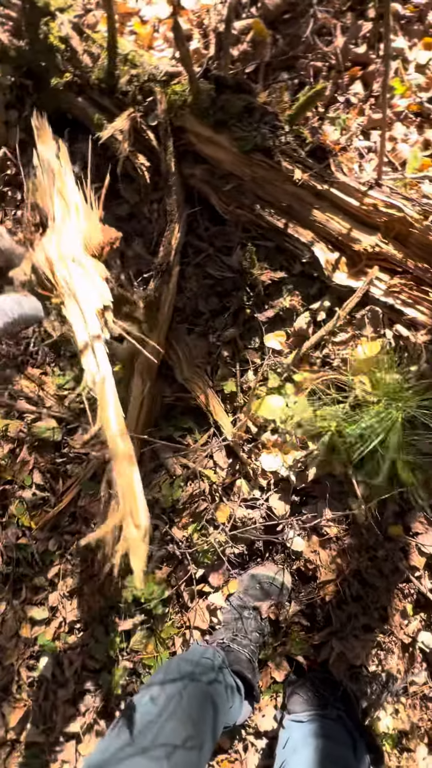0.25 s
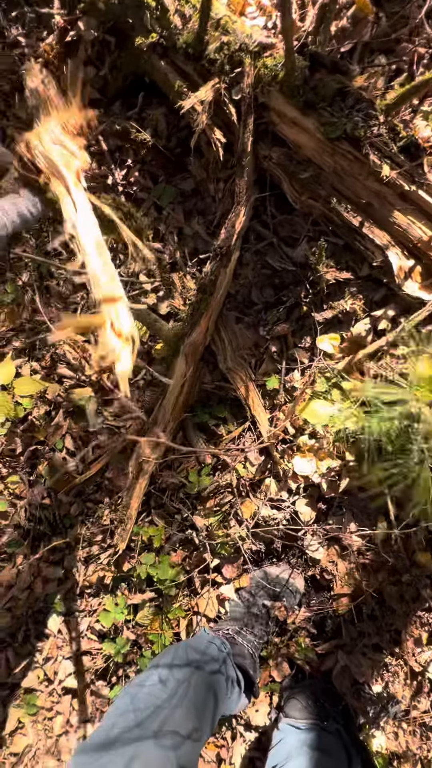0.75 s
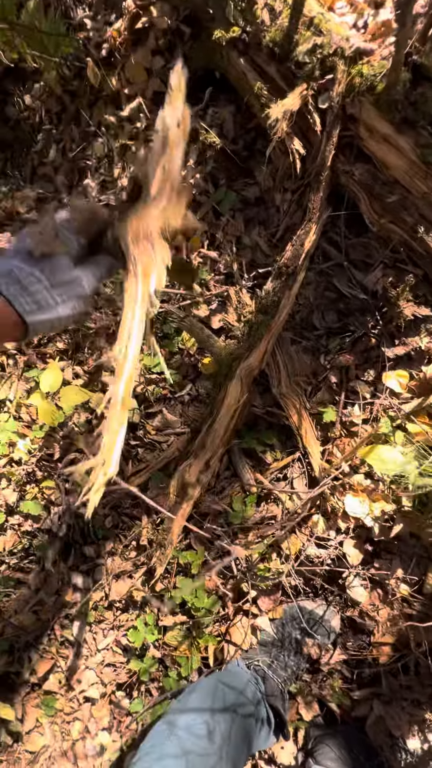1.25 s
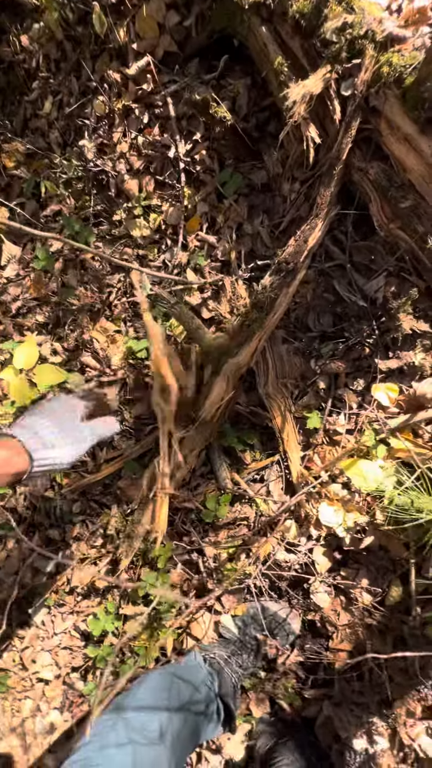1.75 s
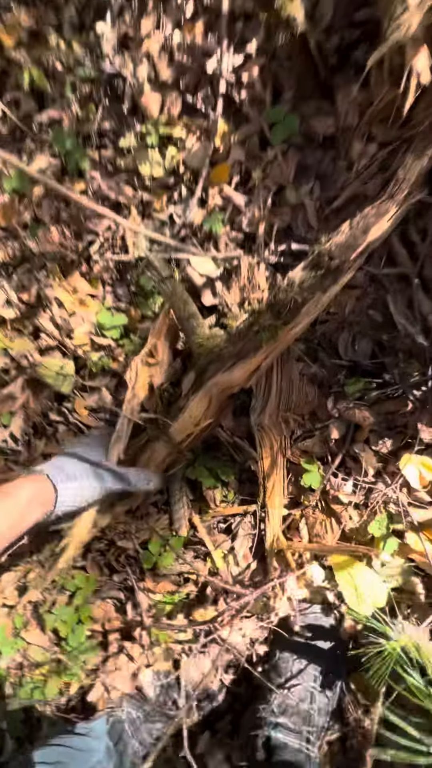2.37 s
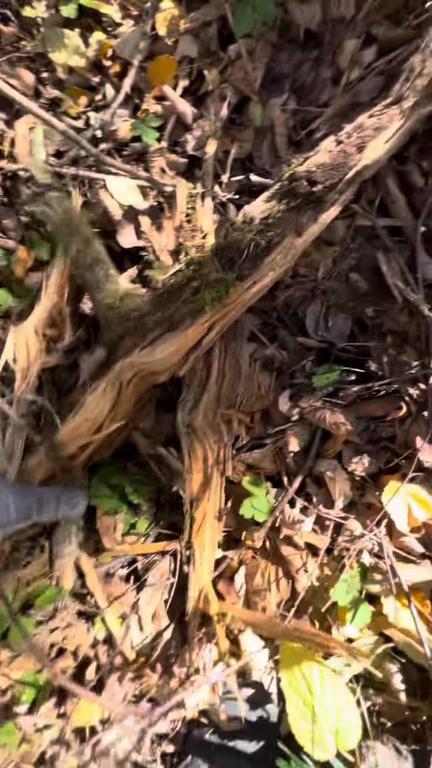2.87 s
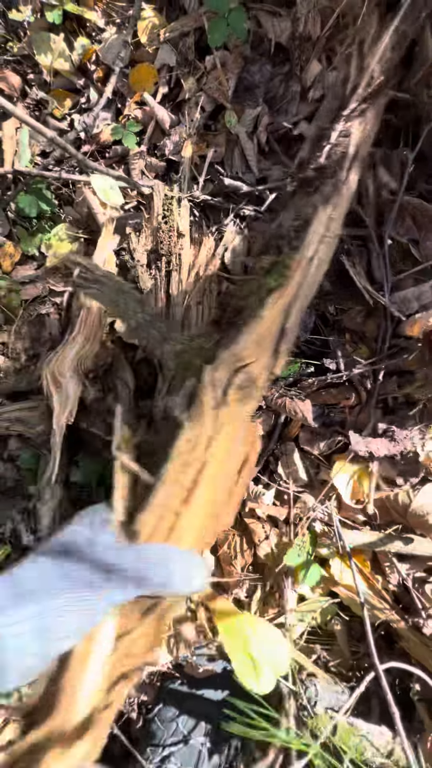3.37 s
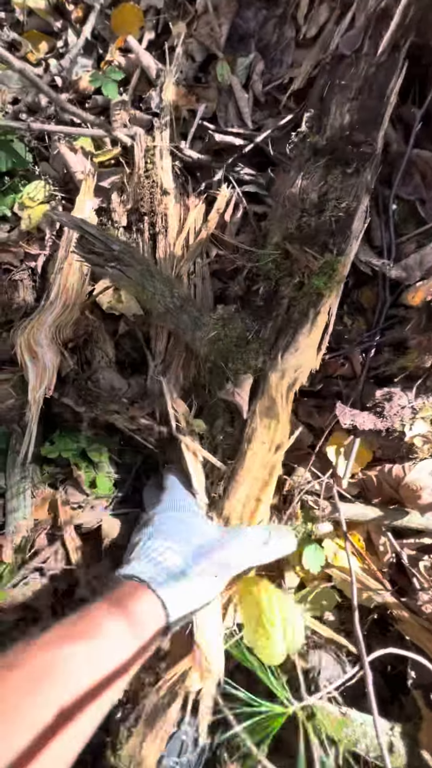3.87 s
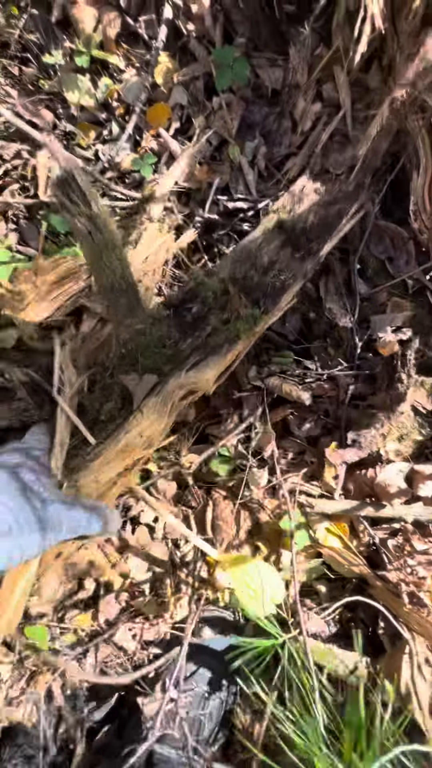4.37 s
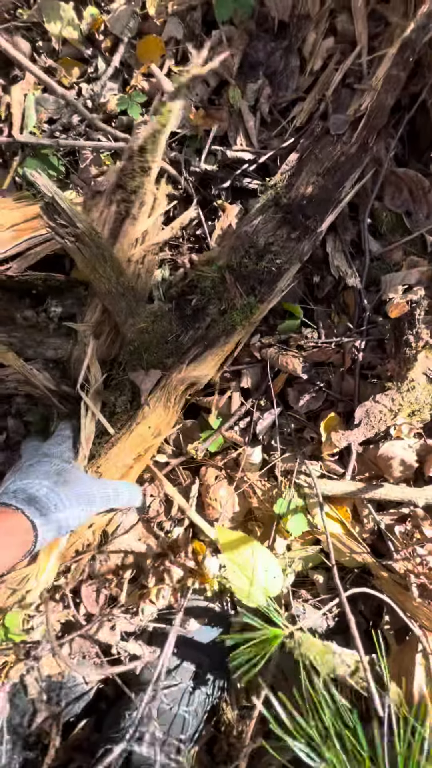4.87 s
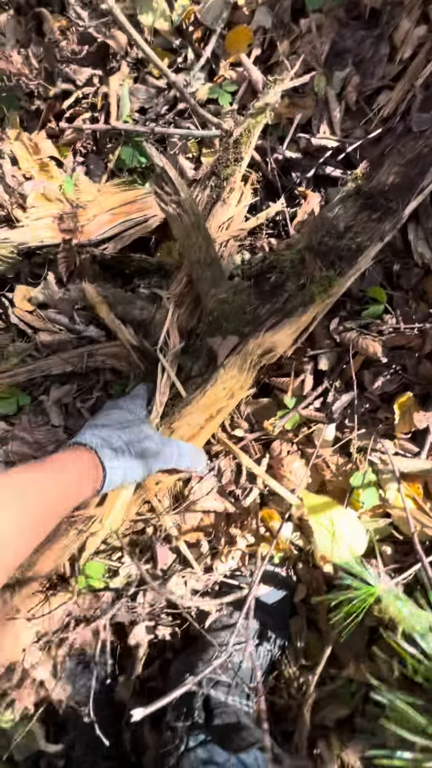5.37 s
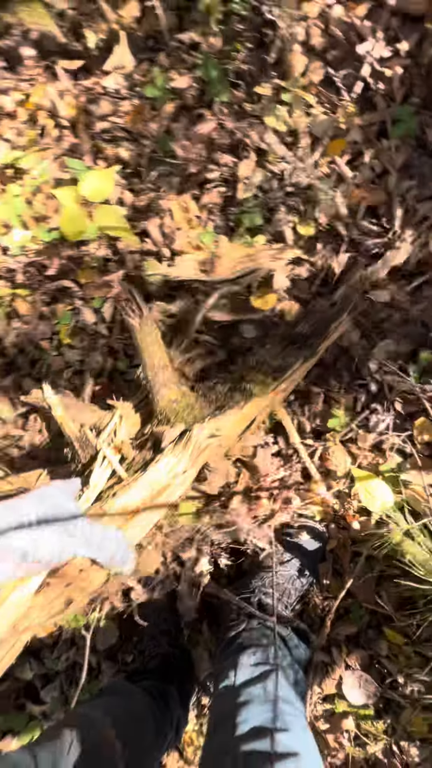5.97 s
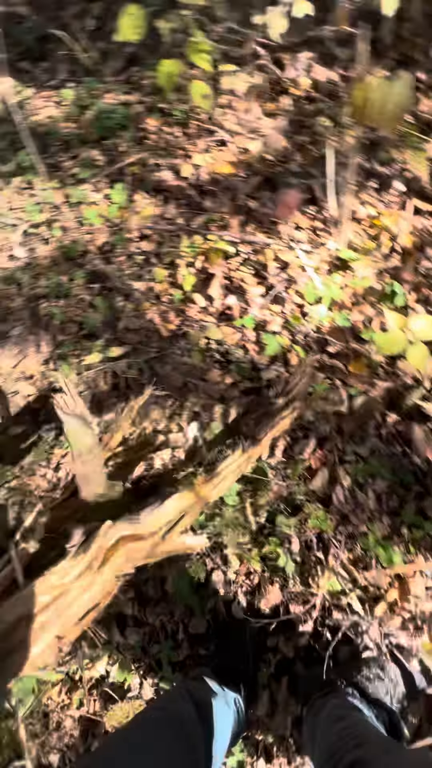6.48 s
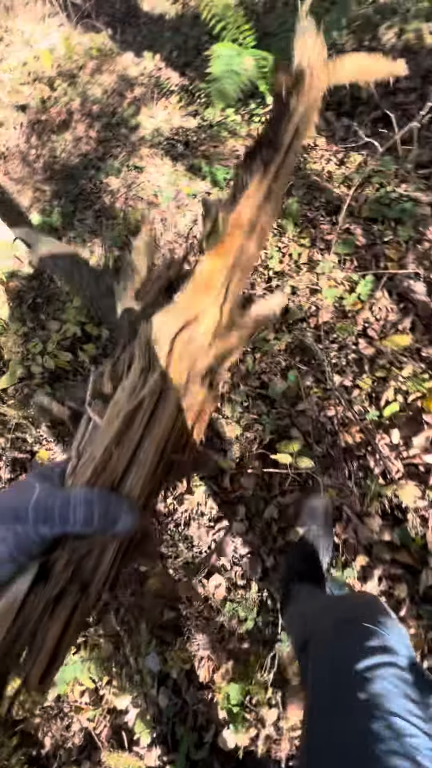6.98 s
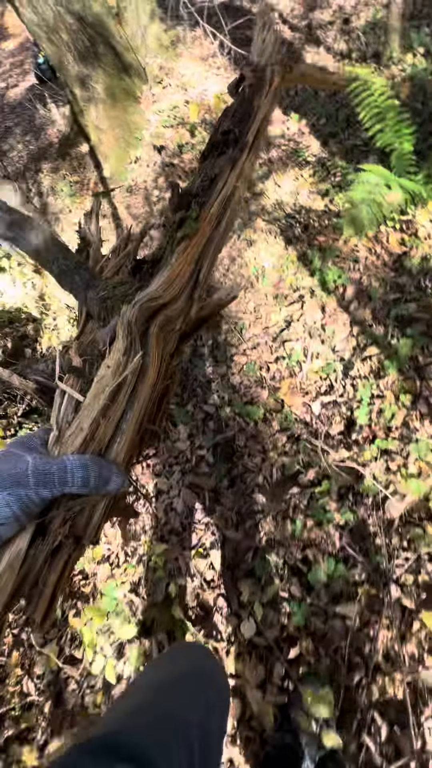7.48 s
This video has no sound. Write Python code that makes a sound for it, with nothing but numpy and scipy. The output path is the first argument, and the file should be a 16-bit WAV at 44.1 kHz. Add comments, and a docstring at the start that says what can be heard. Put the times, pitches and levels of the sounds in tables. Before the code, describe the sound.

Very close, dry outdoor sound with almost no echo. Light leaf rustle and small ticks come first, with one clean twig snap and a strip dropping. Leaves crunch, then rotten wood is wrenched in swelling, jerky rips, with loud splinter cracks and short woody knocks. Finally the freed log is dragged noisily through dry litter over soft dull thuds, then settles.

```python
"""Forest floor: a gloved hand tears a dead, fibrous trunk apart and drags it over dry leaves.
Leaves, fibres and wood crackle as dense grains of noise that swell with each pull; flakes and twigs tick.
Splinters snap as shaped noise bursts, and the log knocks with decaying modes as its split sticks and slips.
Soft soil crunch and low noise thuds carry the weight of boots and wood.
Filtered noise is the quiet air, and sparse scatter gives almost no echo."""
import sys
import numpy as np
from scipy import signal
from scipy.io import wavfile
from scipy.ndimage import uniform_filter1d

SR = 44100
rng = np.random.default_rng(int(sys.argv[2]) if len(sys.argv) > 2 else 0)


def to_wav(sig):
    """Store sig (one row per channel, or 1-D mono) as 16-bit WAV at the path in sys.argv[1].

    Samples outside -1..1 are clipped; the rate is SR.
    """
    pcm = np.clip(np.atleast_2d(sig), -1, 1) * 32767
    pcm = np.round(pcm).astype(np.int16)
    wavfile.write(sys.argv[1], SR, pcm.T)  # frames by channels


N = 340893  # length in samples

FIRM_DB = -36  # effort of a firm pull, the reference for layers that follow the effort

# tone of the dry leaves: f/Hz, level/dB
LEAF_TONE = [(1500, -47), (2900, -5), (4200, -15), (5400, -16.5), (6200, 1.5), (7200, -0.5), (8300, 0),
             (10300, -1), (11200, -6), (12000, -14), (16000, -15.5)]
# tone of the ripping fibres: f/Hz, level/dB
FIBRE_TONE = [(1200, -22.5), (2200, -3), (2900, -4.5), (3500, -1), (4300, 0), (5700, 0.5), (7000, -2.5),
              (11000, -15)]
# tone of the coarse wood scrape: f/Hz, level/dB
WOOD_TONE = [(300, -16.5), (500, -12), (750, -5.5), (1050, 1), (1500, 0.5), (2100, 0.5), (2800, -1),
             (5000, -22), (9000, -44)]
# scrape level at a firm pull (dB), and dB gained per dB of effort
SCRAPE_DB, SCRAPE_FOLLOW = -41.5, 0.85


def tearing(jerk_db=1.26, jerks_per_s=140, catch_db=1.24, catches_per_s=25):
    """Leaves crackle, fibres rip and coarser wood scrapes; the pull moves all three in small jerks."""
    leaves = crackle(LEAF_TONE, per_s=3500, spread_db=3.0, t60=0.00074, clump_db=0.5,
                     clumps_per_s=170, hiss_db=0.5, patchy_db=2.5)
    fibres = crackle(FIBRE_TONE, per_s=2500, spread_db=3.0, t60=0.0024, clump_db=-1.0,
                     clumps_per_s=430, hiss_db=0.0, patchy_db=2.0)
    wood = crackle(WOOD_TONE, per_s=1400, spread_db=1.0, t60=0.0048, clump_db=1.5,
                   clumps_per_s=90, hiss_db=0.5, patchy_db=2.5)
    effort_db = effort()
    scrape_db = SCRAPE_DB + SCRAPE_FOLLOW * (effort_db - FIRM_DB)
    pull = leaves * amp(effort(leafy=True)) + fibres * amp(effort_db) + wood * amp(scrape_db)
    jerks_db = jerk_db * wander(jerks_per_s) + catch_db * wander(catches_per_s)
    return pull * amp(jerks_db)


# pulls and shoves on the wood: t/s at the hardest, level/dB of effort, build-up/s, let-go/s,
# dry leaves over fibres/dB
# to 1.7 s a loose strip is turned in the hand and dropped; to 2.7 s steps through the leaves, taking hold;
# to 6.3 s the trunk is wrenched until it splits, then peeled away;
# from 6.5 s the freed log is dragged and lifted out of the litter
PULL_MOVES = [ (0.1, -59.5, 0.31, 0.35, 1.5), (0.636, -48, 0.028, 0.016, 2), (1.03, -57.5, 0.16, .27, -6),
              (1.44, -54.5, 0.061, 0.047, 4.5), (1.625, -40.5, 0.023, 0.09, -12),
              (1.8, -45.5, 0.16, 0.11, 2.5), (2.0, -45.5, 0.17, 0.23, 8.5), (2.19, -31.5, 0.11, 0.056, 4),
              (2.3, -41.5, 0.098, 0.17, 4), (2.67, -41.5, 0.2, 0.48, 0), (2.971, -32, 0.077, 0.11, 0.5),
              (3.16, -34, 0.11, 0.095, -2), (3.45, -32, 0.23, 0.2, -1.5), (3.809, -31.5, .08, .14, -3.5),
              (4.12, -35.5, 0.28, 0.27, -1.5), (4.475, -35, 0.12, 0.097, 0.5), (4.8, -42, 0.17, 0.74, 1.5),
              (5.18, -36, 0.16, 0.25, 1.5), (5.47, -36, 0.053, 0.043, -4), (5.919, -31, 0.35, 0.1, -1),
              (6.05, -35.5, 0.021, 0.072, 0.5), (6.21, -36.5, 0.069, 0.1, -1.5),
              (6.56, -41.5, 0.071, 0.22, 6.5), (6.78, -34.5, 0.096, 0.036, 2.5),
              (7.038, -28.5, 0.065, .13, 1.5), (7.3, -49, 0.035, 0.15, 6), (7.58, -52, 0.095, 0.18, 5.5)]
PULL_DROP_DB = 8.5  # effort lost over one build-up or let-go time
BUILD_CURVE, LET_GO_CURVE = 1.19, 1.155  # 1 = straight in dB, 2 = a bell
RESTING_DB = -67  # the litter never quite settles
# the wood catches and the movement dies down until it gives: t/s at the stillest, depth/dB
CATCHES = [(0.382, 10), (0.525, 13), (1.327, 7), (1.545, 3), (3.684, 11), (4.68, 5), (5.11, 7.5),
           (6.5, 3.5), (6.961, 8)]
STALL_S, RESUME_S = 0.016, 0.0094  # time scales of dying down and starting again


def effort(leafy=False):
    """Level in dB of all pulls: each builds up, peaks and lets go; leafy weighs them by the leaves they stir."""
    t = np.arange(0, N / SR, 0.002)
    power = amp(RESTING_DB) ** 2
    for s, db, build_s, let_go_s, leaves_db in PULL_MOVES:
        building = abs((t - s) / build_s) ** BUILD_CURVE
        letting_go = abs((t - s) / let_go_s) ** LET_GO_CURVE
        away = np.where(t < s, building, letting_go)
        power = power + amp(db + leafy * leaves_db - PULL_DROP_DB * away) ** 2
    stalled_db = 0
    for s, depth_db in CATCHES:
        stalled_db = stalled_db + depth_db * np.exp(-((t - s) / np.where(t < s, STALL_S, RESUME_S)) ** 2)
    return np.interp(np.arange(N) / SR, t, 10 * np.log10(power) - stalled_db)


def crackle(spectrum, per_s, spread_db, t60, clump_db, clumps_per_s, hiss_db, patchy_db, count=24, size=256):
    """Countless tiny fractures in clumps, as mid and side; each of the fibre types has its own brief ring."""
    t = np.arange(size) / SR
    strength = amp(spread_db * np.minimum(rng.exponential(1, N), 4.5)) * rng.choice([-1, 1], N)
    breaks = strength * (rng.random(N) < per_s / SR)
    fibre = rng.integers(0, count, N)
    ring_t60 = t60 * rng.uniform(0.19, 2.8, (count, 1, 1))
    rings = rng.standard_normal((count, 2, size)) * amp(-60 * t / ring_t60)
    grains = np.zeros((2, N))
    for k in range(count):
        grains += signal.oaconvolve((breaks * (fibre == k))[None], unit(rings[k]), axes=1)[:, :N]
    # the smallest fractures merge into a hiss
    dense = unit(grains) + amp(hiss_db) * rng.standard_normal((2, N))
    clumped = dense * amp(clump_db * wander(clumps_per_s))
    return unit(colour(patchy(clumped, patchy_db), lambda f: read(spectrum, f)))


def patchy(x, depth_db, size=512):
    """Each handful of fragments has sizes of its own, so the colour keeps shifting."""
    z = signal.stft(x, nperseg=size)[2]
    over_f = uniform_filter1d(rng.standard_normal(z.shape), 5, axis=1)
    patches = unit(uniform_filter1d(over_f, 4, axis=2))
    return signal.istft(z * amp(depth_db * patches), nperseg=size)[1][:, :N]


# splinters snapping: t/s, peak level/dB, centre f/Hz
SPLINTER_SNAPS = [(0.303, -25.5, 8950), (.451, -29.5, 4800), (.572, -31.5, 7800), (1.027, -29.5, 5500),
                  (1.078, -30.5, 6300), (1.213, -31.5, 6400), (1.371, -30.5, 7750), (1.558, -27, 1900),
                  (1.57, -18, 9100), (1.612, -22, 4600), (1.6205, -15.5, 4070), (1.655, -21, 4930),
                  (1.702, -21.5, 5000), (2.082, -10, 7900), (2.384, -21, 6150), (2.451, -21.5, 8700),
                  (3.071, -21, 1590), (3.159, -14, 7060), (3.4205, -10, 7140), (3.4468, -2.5, 2600),
                  (3.4681, -7, 7800), (3.5312, -12, 9500), (3.708, -19.5, 4070), (3.81, -5.5, 5100),
                  (3.811, -9, 2050), (3.869, -10.5, 4970), (4.199, -37, 4970), (4.239, -21.5, 1700),
                  (4.42, -14.5, 5200), (4.7074, -17, 6600), (4.838, -25, 8100), (5.071, -18, 7650),
                  (5.1218, -17.5, 6100), (5.7959, -14, 1610), (5.8034, -16, 7450), (6.039, -13.5, 3230),
                  (6.23, -18.5, 3070), (6.33, -24.5, 6660), (6.794, -18.5, 3000), (6.905, -22, 1540),
                  (6.924, -17, 4000), (6.978, -22, 6900)]
# tone shared by all splinters: f/Hz, level/dB
SPLINTER_TONE = [(150, -51), (500, -4.5), (1100, 9.5), (6500, 2), (10000, 5), (12200, -3), (16000, 3)]


def snaps(octaves=0.94, skirt_db=-16, crack_s=0.0012, fray_db=-14, fray_t60=0.038, strain_t60=0.016,
          ring_db=-13, ring_t60=0.002, size=4000):
    """Single fibres give as a splinter strains; it parts in a sharp crack, rings briefly, and the last fray."""
    out, t = np.zeros((2, N)), (np.arange(size) - size / 2) / SR  # the crack starts at t = 0
    after, rip_db = np.maximum(t, 0), effort()
    crack = 2 * np.sqrt(after / crack_s) * np.exp(-after / crack_s)
    for s, db, hz in SPLINTER_SNAPS:
        fibres = unit(uniform_filter1d(rng.exponential(1, size) ** 4, size=24))
        # a snap that stands far above the ripping around it is a clean break, with less fraying
        fray = fray_db + min(0, rip_db[int(s * SR)] + 32.5 - db)
        fraying = fibres * amp(fray - 60 * abs(t) / np.where(t < 0, strain_t60, fray_t60))
        burst = rng.standard_normal((2, size)) * (crack + fraying)
        burst[0] += amp(ring_db - 60 * after / ring_t60) * np.sin(2 * np.pi * hz * after)

        def tone(f):
            away = np.log2((f + 1) / hz) / octaves
            return read(SPLINTER_TONE, f) + skirt_db * (1 - np.exp(-away ** 2))

        snap = colour(burst, tone)
        add(out, s + t[0], snap * amp(db) / abs(snap).max())
    return out


# the log sticking and slipping, or knocked: t/s, peak level/dB, f/Hz that the slip excites most
LOG_SLIPS = [(1.685, -45, 400), (3.4453, -6, 1370), (3.459, -12, 1850), (3.472, -11, 1800),
             (3.498, -14.5, 1850), (3.505, -26, 1840), (3.512, -18.5, 1620), (3.573, -27.5, 1850),
             (3.7078, -14, 1480), (3.713, -31, 1220), (3.7641, -12.5, 1490), (3.773, -22.5, 1390),
             (3.776, -22, 1600), (3.813, -29, 1730), (3.8138, -25, 520), (5.797, -23, 1110),
             (5.8054, -24, 744)]
# modes of the log: f/Hz, level/dB, t60/s
LOG_MODES = [(400, -32, 0.044), (559, -5.5, 0.046), (1010, -8.5, 0.067), (1100, -6.5, 0.03),
             (1610, -13, 0.017), (1756, 2, 0.026), (1894, 8, 0.02), (2070, -22, 0.014)]


def slips(octaves=0.79, rise_s=0.0013, scatter=0.035, side_db=0, size=4000):
    """Each slip of the split kicks the modes of the log, which swell for a moment and die quickly."""
    out, t = np.zeros((2, N)), np.arange(size) / SR
    hz, mode_db, t60 = np.transpose(LOG_MODES)[:, :, None]
    swell = 1 - np.exp(-(t / rise_s) ** 2)
    for s, db, centre_hz in LOG_SLIPS:
        weight = 1 / (1 + (np.log2(hz / centre_hz) / octaves) ** 4)
        pitch = hz * (1 + scatter * rng.uniform(-1.0, 1, hz.shape))
        modes = weight * amp(mode_db - 60 * t / t60) * np.sin(2 * np.pi * pitch * t) * swell
        # each mode leans to one side at random
        side = amp(side_db) * (modes * rng.choice([-1, 1], hz.shape)).sum(0)
        knock = np.array([modes.sum(0), side])
        add(out, s, knock * amp(db) / abs(knock[0]).max())
    return out


# modes of a dry twig: f/Hz, level/dB, t60/s
TWIG_MODES = [(630, -23, 0.021), (1370, -5.5, 0.0073), (2350, -7, .007), (3580, 0.5, 0.0073),
              (6360, 6.5, 0.0034), (7300, -5, 0.0085), (8340, 1, 0.0035), (10300, 0.5, 0.0034)]
TWIG_S, TWIG_DB = 1.1638, -10  # time and peak level of its break off the loose strip


def twig(rise_s=0.0002, crack_db=-5, crack_t60=0.0072, side_db=-3, low_hz=550, size=2000):
    """One clean break: a burst of tearing fibres and the brief ring of the twig."""
    out, t = np.zeros((2, N)), np.arange(size) / SR
    hz, db, t60 = np.transpose(TWIG_MODES)[:, :, None]
    phase = rng.random((2, len(TWIG_MODES), 1))
    ring = (amp(db - 60 * t / t60) * np.sin(2 * np.pi * (hz * t + phase))).sum(1)
    burst = rng.standard_normal((2, size)) * amp(crack_db - 60 * t / crack_t60)
    click = (ring + burst) * (1 - np.exp(-(t / rise_s) ** 2))
    # the click carries little bass
    click = signal.sosfilt(signal.butter(2, low_hz, "high", fs=SR, output="sos"), click)
    add(out, TWIG_S, click * amp([[TWIG_DB], [TWIG_DB + side_db]]) / abs(click[0]).max())
    return out


def ticks(per_s=60, over_db=10, spread_db=0.5, low_hz=1500, high_hz=9000, cycles=1.12, size=400):
    """Single twigs and stiff fibres break out of the rustle, each with its own pitch and direction."""
    out, t = np.zeros((2, N)), np.arange(size) / SR
    # ticks grow quieter with a lighter touch, but a little less than the rustle,
    # so they stand out more in the lulls
    rip_db = effort()
    effort_db = rip_db + 0.2 * (np.median(rip_db) - rip_db)
    for when, pitch, luck, bearing in rng.random((int(per_s * N / SR), 4)):
        hz = low_hz * (high_hz / low_hz) ** np.sqrt(pitch)
        age = t * hz / cycles
        ring = 2 * np.sqrt(age) * np.exp(-age) * np.sin(2 * np.pi * hz * t)
        db = effort_db[int(when * N)] + over_db - spread_db * np.log(luck + 0.14)
        add(out, when * N / SR, amp(db) * ring * np.array([[1], [2 * (2 * bearing - 1)]]))
    return out


# tone of the bark flakes: f/Hz, level/dB
FLAKE_TONE = [(400, -27.5), (1500, 4.5), (6500, 4), (10500, -3), (16000, -22)]


def flakes(level_db=-47, follow=0.48):
    """Brittle flakes of bark crack one by one, plain to hear while the touch is light."""
    cracks = crackle(FLAKE_TONE, per_s=110, spread_db=3.0, t60=0.0015, clump_db=4,
                     clumps_per_s=24, hiss_db=-26, patchy_db=5, count=8)
    return cracks * amp(level_db + follow * (effort() - FIRM_DB))


# boots and wood bearing down on the soil: t/s, peak level/dB, centre f/Hz, t60/s
SOIL_THUDS = [(1.685, -43.5, 199, 0.12), (2.14, -39.5, 250, 0.5), (3.447, -34, 450, .05),
              (3.709, -35.5, 380, 0.029), (3.81, -47, 95, 0.22), (3.813, -33.5, 430, 0.022),
              (5.235, -39, 180, 0.082), (5.779, -43.5, 80, .35), (6.02, -47, 85, .5),
              (6.235, -41.5, 132, 0.31), (7.021, -38, 260, 0.33), (7.247, -37, 187, 0.11),
              (7.245, -42, 58, 0.25), (7.59, -46, 200, 0.1)]


def thuds(rise_share=0.016, slope_db=-6, side_db=-3, size=30000):
    """The soil gives under a load with a low push; a slow load also sets in slowly."""
    out, t = np.zeros((2, N)), np.arange(size) / SR
    for s, db, hz, t60 in SOIL_THUDS:
        onset = 1 - np.exp(-t / (rise_share * t60))
        push = rng.standard_normal((2, size)) * amp(-60 * t / t60) * onset
        thud = colour(push, lambda f: np.maximum(slope_db * np.log2((f + 1) / hz) ** 2, -50), size=4096)
        add(out, s, thud * amp([[db], [db + side_db]]) / abs(thud).max())
    return out


# tone of the soil crunch: f/Hz, level/dB
SOIL_TONE = [(25, -4), (50, -5.5), (80, -1), (150, 2), (240, 8.5), (340, 5), (480, -2), (900, -7),
             (2000, -12.5)]
# weight borne by the ground: t/s, crunch level/dB at a firm pull
GROUND_WEIGHT = [(0, -56.5), (0.45, -68), (0.85, -54), (1.5, -65.5), (1.7, -51), (2.0, -61), (2.6, -60),
                 (3.098, -54), (4.7, -52), (5.25, -50.5), (6.3, -52), (6.5, -51), (7.05, -48.5),
                 (7.73, -56)]
SOIL_FOLLOW = 0.39  # dB of soil crunch per dB of effort


def ground():
    """Soft litter crunches dully under the weight of boots and wood, a little more during a hard pull."""
    crunch = crackle(SOIL_TONE, per_s=400, spread_db=1.5, t60=0.0067, clump_db=-1.5,
                     clumps_per_s=40, hiss_db=-2.0, patchy_db=3.5)
    weight_db = np.interp(np.arange(N) / SR, *np.transpose(GROUND_WEIGHT))
    return crunch * amp(weight_db + SOIL_FOLLOW * (effort() - FIRM_DB))


def forest(x, wet_db=-19, t60=0.067, size=12000):
    """Faint scatter from the ground and nearby trunks: sparse random echoes that die quickly."""
    t = np.arange(size) / SR
    sparse = rng.standard_normal((2, size)) * (rng.random((2, size)) < 0.05)
    taps = sparse * amp(-60 * t / t60) * (t > 0.003)
    return x + amp(wet_db) * signal.oaconvolve(x, taps / np.linalg.norm(taps[0]), axes=1)[:, :N]


# tone of the open air: f/Hz, level/dB
AIR_TONE = [(20, -22), (60, -2), (150, -18), (300, -3), (600, -6), (2000, -9.5), (8000, -13.5),
            (16000, -62)]


def air(level_db=-66):
    """The quiet wash of the woods: steady filtered noise."""
    return amp(level_db) * unit(colour(rng.standard_normal((2, N)), lambda f: read(AIR_TONE, f)))


def amp(db):
    """Decibels to gain."""
    return 10 ** (np.asarray(db) / 20)


def unit(x):
    """Scales to an rms of one."""
    return x / np.sqrt(np.mean(x ** 2) + 1e-20)


def read(points, hz):
    """Reads a table of f/Hz and level/dB on a log-frequency axis."""
    f, value = np.transpose(points)
    return np.interp(np.log(hz + 1), np.log(f + 1), value)


def colour(x, db_at, size=1024):
    """Causal (minimum-phase) filter whose gain in dB is a function of frequency."""
    log_gain = np.log(amp(db_at(abs(np.fft.fftfreq(size, 1 / SR)))))
    taps = np.fft.ifft(np.exp(np.conj(signal.hilbert(log_gain)))).real
    return signal.oaconvolve(x, taps[None], axes=1)[:, :x.shape[1]]


def add(mix, s, sound):
    """Lays a sound into the mix at a time in seconds."""
    part = mix[:, round(s * SR):][:, :sound.shape[1]]
    part += sound[:, :part.shape[1]]


def wander(per_s):
    """Smooth chance with an rms of one: straight lines between random points."""
    knots = rng.standard_normal(N // 16)
    return unit(np.interp(np.arange(N) / SR * per_s, np.arange(len(knots)), knots))


# stereo width, as gain on the side signal: f/Hz, level/dB
SIDE_WIDTH = [(60, 10), (99, -11), (160, -1), (270, -1.5), (450, 10), (740, 7), (1220, -4.5), (2010, -22.5),
              (3330, -26), (5500, -4), (9080, -12.5), (15000, 0.5)]


def scene(left_db=4.0, left_hz=180, left_octaves=1.98, lag=0.72):
    """All sources as mid and side, spread to left and right; the upper bass leans left."""
    above_ground = tearing() + flakes() + twig() + ticks() + snaps() + slips()
    mid, side = forest(above_ground) + ground() + thuds() + air()
    side = colour(side[None], lambda f: read(SIDE_WIDTH, f))[0]
    # the sound reaches the left side a moment later
    side = side - lag * np.gradient(mid)

    def lean(f):
        return left_db * np.exp(-(np.log2((f + 1) / left_hz) / left_octaves) ** 2)

    left = colour((mid + side)[None], lean)
    right = colour((mid - side)[None], lambda f: -lean(f))
    return np.vstack([left, right])


def record(dry, low_hz=42, edge_hz=16050):
    """A low cut below the bass, and the recorder's band limit."""
    thinned = signal.sosfilt(signal.butter(4, low_hz, "high", fs=SR, output="sos"), dry)
    band_limit = signal.firwin(511, edge_hz, window=("kaiser", 9), fs=SR)
    return signal.oaconvolve(thinned, band_limit[None], "same")


dry = scene()
out = record(dry)
to_wav(out)
```